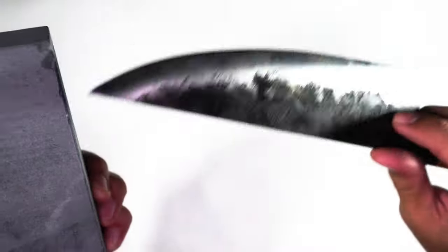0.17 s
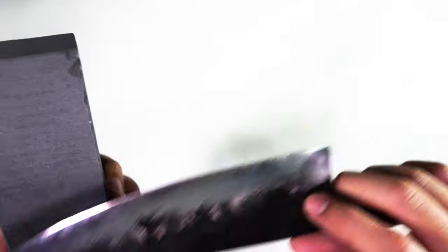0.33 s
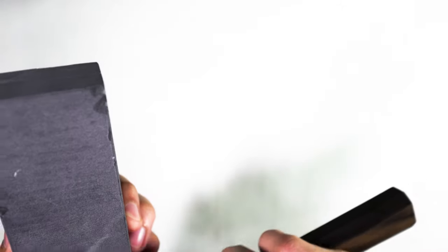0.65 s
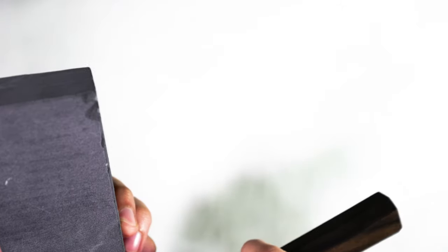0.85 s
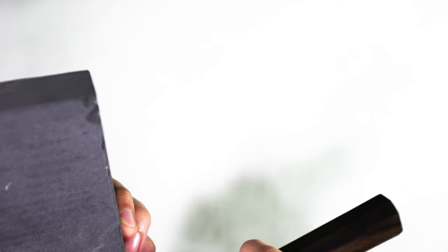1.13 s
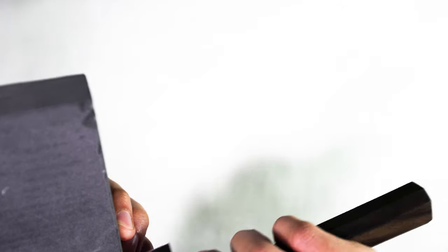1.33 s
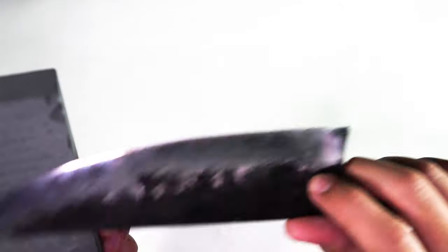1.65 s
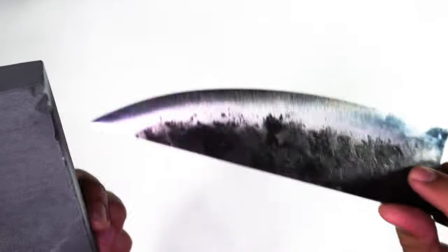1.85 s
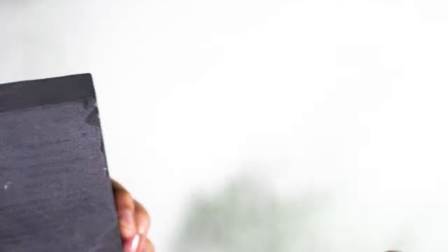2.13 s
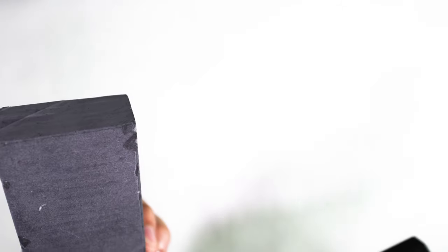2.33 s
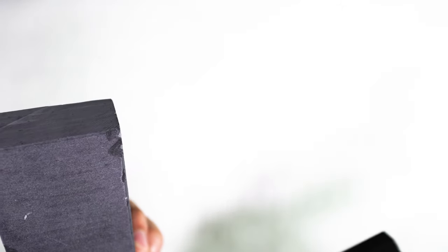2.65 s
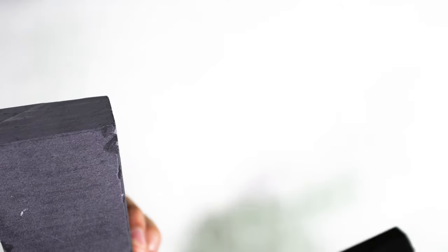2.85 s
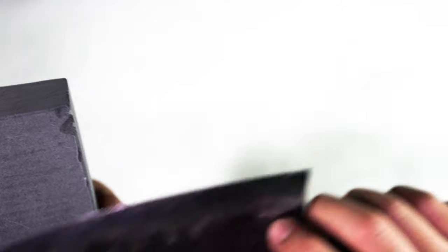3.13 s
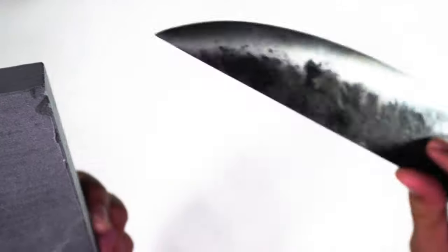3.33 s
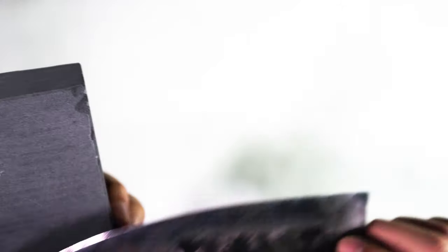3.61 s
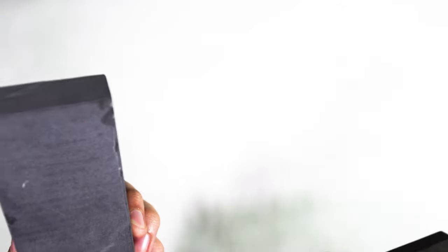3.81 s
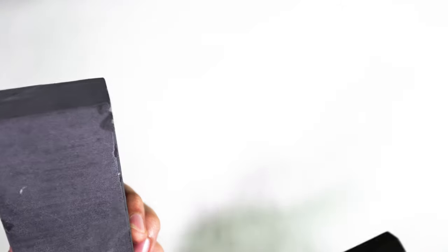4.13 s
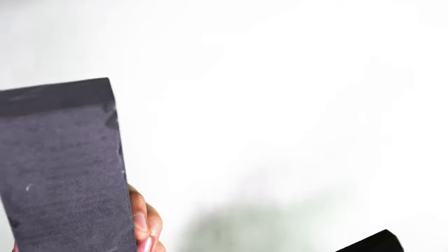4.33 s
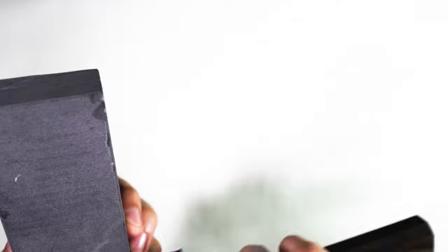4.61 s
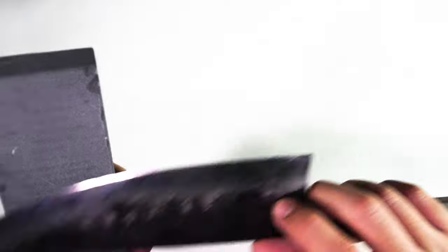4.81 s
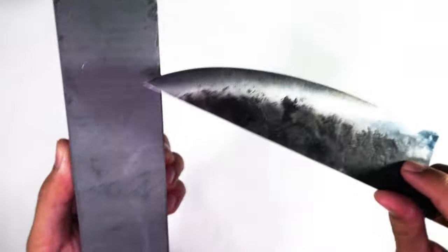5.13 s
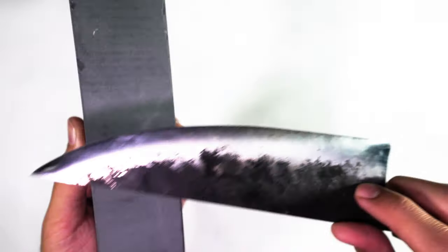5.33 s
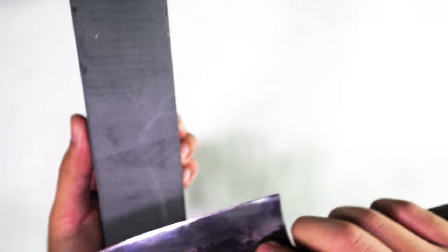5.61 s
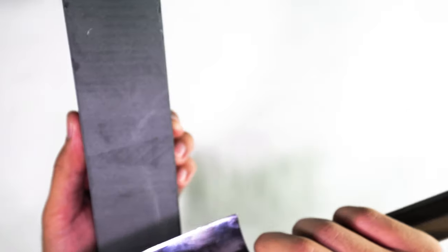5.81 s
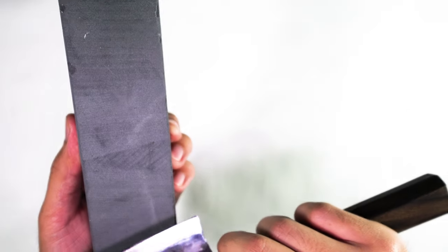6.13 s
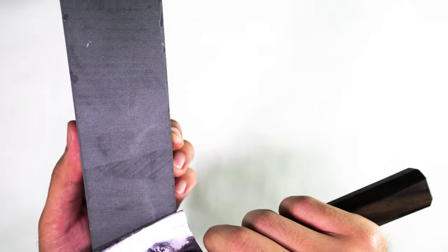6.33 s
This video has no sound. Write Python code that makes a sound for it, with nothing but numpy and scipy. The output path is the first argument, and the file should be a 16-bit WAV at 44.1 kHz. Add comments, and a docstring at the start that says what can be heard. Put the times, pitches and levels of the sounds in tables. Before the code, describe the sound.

Gritty, bright scraping of knife on whetstone, close to the microphone. Strokes come slowly, with more than a second between them, each starting softly, pressing hard and stopping abruptly with a very short steel ring. Faint taps and brushes precede the later strokes. Afterwards only barely audible touches remain over steady low fan rumble in a small, short-echoing room.

```python
"""Knife on a whetstone

Close on a hand-held whetstone: a steel blade is drawn over it heel to tip four times, the first stroke
already under way. Light touches come between the strokes and after the last.
Uneven noise stands for grit; as the contact slides along the edge, one plate resonance after another
lights up over the stone's hiss, with a short steel ring beside it. A small room answers over steady
ventilation rumble, made of shaped noise and fan lines; the recorder ducks a little on loud strokes.
"""
import sys
import numpy as np
from scipy import signal
from scipy.fft import rfft, irfft
from scipy.io import wavfile
from scipy.ndimage import uniform_filter1d, map_coordinates

SR = 44100
rng = np.random.default_rng(int(sys.argv[2]) if len(sys.argv) > 2 else 0)


def invert_db(level):
    """Linear amplitude ratio for a level in decibels (20 dB per decade), elementwise."""
    return 10 ** (np.asarray(level, dtype=float) / 20)


def to_wav(s):
    """Save 16-bit WAV."""
    ch = np.atleast_2d(s).T  # columns
    pcm = np.round(np.clip(ch, -1, 1) * 32767)  # PCM
    wavfile.write(sys.argv[1], SR, pcm.astype(np.int16))


N = 284886  # samples
FRAME, HOP = 1536, 128  # samples, for the moving blade filter


def unit(x):
    """Scales a signal to an rms of one."""
    return x / np.sqrt(np.mean(x ** 2) + 1e-20)


def along(points, hz):
    """Reads (Hz, value) points on a log frequency axis."""
    point_hz, values = np.transpose(points)
    return np.interp(np.log(hz + 1), np.log(point_hz + 1), values)


def wobble(rate):
    """A smooth random curve with rate knots a second."""
    knots = rng.standard_normal(int(N * rate / SR) + 4)
    return map_coordinates(knots, [np.arange(N) * rate / SR])


def causal(gain):
    """Minimum-phase responses for columns of gains, so that no sound precedes its cause."""
    cepstrum = irfft(np.log(gain + 1e-6), axis=0)
    half = len(cepstrum) // 2
    cepstrum[1:half] *= 2
    cepstrum[half + 1:] = 0
    return np.exp(rfft(cepstrum, axis=0))


# Strokes over the stone. Places run from 0 at the heel to 1 at the tip, in blade lengths.
# Each row: touch in seconds, lift in seconds, settling time in seconds, easing time before the lift in
# seconds, starting place before drag, drag in blade lengths, low-mode drive at mid-blade in dB.
STROKE_ROWS = [(-.39, 0.131, .02, .036, .1, .07, 0), (1.202, 1.845, .016, .056, -.015, -.012, -2.5),
               (2.806, 3.349, .04, .027, -0.011, .07, 6.5), (4.5, 5.039, .03, .068, .09, .065, -5)]
# The hand falls behind an even pace, then catches up.
# Each row: share of the stroke 0-1, share of the drag.
HAND_LAG = [(0, -0.14), (.35, 1.01), (.6, .7), (.72, 0), (.84, -.35), (1, -0.1)]
# The edge bites harder or skips for a moment.
# Each row: centre in seconds, level change in dB, time from centre to 1/e of that in seconds.
BITE_ROWS = [(0.086, 2.5, .03), (1.304, -5, .02), (1.58, 3, .012), (2.972, 0.5, .05), (3.044, 2.5, .025),
             (4.717, 2, .04), (4.9, -1.5, .06), (4.961, 2.1, 0.011)]
# Light touches of the edge or, at places beyond 0-1, of its corners.
# Each row: peak in seconds, level in dB, rise in seconds, time to fall 20 dB in seconds,
# place in blade lengths, low-mode drive in dB.
TOUCH_ROWS = [(1.02, -47, .035, 0.032, 1.3, -2.5), (2.546, -35, .012, 0.041, -.3, -15),
              (2.572, -46, .004, .012, -.3, -7.5), (2.62, -57, .015, .01, -.3, -7.5),
              (2.768, -45, .018, 0.059, -.3, -5.5), (2.81, -35, .02, .2, -.27, -5),
              (4.29, -33, .026, .022, 1.3, 0), (4.407, -52, .002, .03, -0.017, -19),
              (4.433, -32, .007, .014, .15, -16.5), (4.469, -45, .003, .045, .12, -12.5),
              (5.345, -61.5, .012, .03, -0.17, -10), (5.64, -63, .03, .04, -0.12, -10.5)]


def contacts(t):
    """Scraping level, place on the edge and low-mode drive; the strongest contact sets the last two."""
    press_db, land_db, ease_db = -17, -45.5, -9  # full pressure; first and last contact relative to it
    end_place, mid_place, mid_reach = 0.95, .58, .12  # blade lengths; the end is before drag
    ends_db, soft_landing = 1, .15  # low-mode drive off mid-blade; dB lost per dB of missing pressure
    touch_rise_db = 24
    rows = []
    for touch_s, lift_s, settle_s, ease_s, start, drag, mid_db in STROKE_ROWS:
        share = np.clip((t - touch_s) / (lift_s - touch_s), 0, 1)
        missing_db = land_db * np.exp(-np.clip(t - touch_s, 0, None) / settle_s)
        easing_db = ease_db * np.clip(1 + (t - lift_s) / ease_s, 0, 1)
        bites_db = sum(bite_db * np.exp(-((t - s) / length_s) ** 2) for s, bite_db, length_s in BITE_ROWS)
        even_place = start + (end_place - start) * share
        place = even_place - drag * np.interp(share, *np.transpose(HAND_LAG))
        middle = np.exp(-((place - mid_place) / mid_reach) ** 2)
        low_db = ends_db + (mid_db - ends_db) * middle + soft_landing * missing_db
        # lifted: falls away steeply outside the stroke
        outside_s = np.clip(touch_s - t, 0, None) + np.clip(t - lift_s, 0, None)
        lifted_db = 1e4 * outside_s + 60 * ((t < touch_s) | (t > lift_s))
        rows.append((press_db + missing_db + easing_db + bites_db - lifted_db, place, low_db))
    for s, db, rise_s, fall_s, place, low_db in TOUCH_ROWS:
        rise_db = touch_rise_db * (t - s) / rise_s - 60 * (t < s - rise_s)
        shape_db = np.where(t < s, rise_db, 20 * (s - t) / fall_s)
        rows.append((db + shape_db, place + 0 * t, low_db + 0 * t))
    db, place, low_db = np.transpose(rows, (1, 0, 2))
    lead = db.argmax(axis=0), np.arange(len(t))
    return np.sqrt(np.sum(invert_db(2 * db), axis=0)), place[lead], low_db[lead]


def grit():
    """Dense uneven scratches under the hand's pressure, all but silent while the blade is lifted."""
    t = np.arange(0, N / SR, .0005)
    pressure = np.interp(np.arange(N) / SR, t, contacts(t)[0])
    scratches = rng.standard_normal(N) * invert_db(0.75 * rng.exponential(1, N))
    judder = invert_db(0.71 * wobble(25) + 1.1 * wobble(200))  # the edge catches and slips
    return pressure * unit(scratches * judder)


# Broad scrape of the stone itself, also the floor under the blade's resonances.
# Each row: frequency in Hz, relative level in dB.
STONE_HISS = [(600, -75.5), (1300, -62.5), (2200, -54), (3300, -44), (4500, -51), (6500, -45),
              (10000, -46.5), (16000, -57.5)]


def hiss(force):
    """The stone's broad scrape: grit noise filtered to a smooth spectrum."""
    gain = invert_db(along(STONE_HISS, np.fft.rfftfreq(N, 1 / SR)))
    return irfft(rfft(force) * gain / np.sqrt(np.mean(gain ** 2)), N)


# Resonances of the pressed blade.
# Each row: frequency in Hz, width 6 dB down in Hz, place of best drive in blade lengths, reach in blade
# lengths, relative level in dB, glide in Hz per blade length.
BLADE_MODES = [(467.5, 79, 0.63, 0.09, -25.5, -600), (810, 420, -0.05, 0.17, -40, -1700),
               (910, 190, 0.81, 0.08, -37, -2200), (960, 70, 0.12, 0.15, -25.5, 800),
               (1033, 63, 0.22, 0.062, -18, 0), (1036, 74, 0.73, 0.077, -29.5, -400),
               (1068, 77, 0.41, 0.08, -26.5, -600), (1070, 81, 0.6, 0.09, -26.5, 300.5),
               (1104, 64, 0.23, 0.03, -19, 101), (1120, 60, 0.65, 0.03, -21.5, -100),
               (1280, 90, 0.65, 0.12, -38.5, -2000), (1328, 120, 0.18, 0.077, -28, -200),
               (1476, 130, 0.93, 0.05, -24, -3000), (1620, 100, 0.62, 0.047, -14.5, 800),
               (1610, 180, 0.45, 0.1, -24.5, -100), (1710, 100, 0.17, 0.05, -13, -700),
               (1704, 120, 0.39, 0.06, -22.5, 800), (1712, 240, 0.819, 0.07, -20, -1800),
               (1775, 110, -0.01, 0.08, -8, -900), (1816, 90, 0.08, 0.036, -8, 500),
               (2110, 190, 0.16, 0.1, -21.5, 700), (2107, 100, 0.57, 0.08, -18.5, 800),
               (2397, 240, 1.036, 0.14, -12, -300), (2466, 85, 0.76, 0.05, -12.5, 600),
               (2550, 180, 0.48, 0.079, -22.5, -900), (2580, 470, 0.06, 0.08, -22, 199.5),
               (2580, 150, 0.29, 0.092, -15, 2200), (2710, 190, 0.33, 0.063, -7.5, 2199.5),
               (2760, 170, 0.4, 0.05, -7, -2300), (2852, 190, 0.84, 0.061, -24, 99),
               (2875, 250, 0.845, 0.04, -10, -400), (3235, 290, 0.76, 0.19, -24.5, -400),
               (3300, 200, 0.18, 0.14, -10, 200), (3400, 190, 0.2, 0.044, -9, 1599.5),
               (3459, 250, 0.476, 0.05, -7.5, 200.5), (3454, 100, 1.05, 0.1, -7, -300),
               (3870, 110, 0.63, 0.099, -14.5, 500.5), (3897, 260, 0.88, 0.033, -11, -200),
               (3896, 140, 0.28, 0.092, -12, 200), (4291, 180, 0.11, 0.18, -16, 199),
               (4310, 220, 0.65, 0.2, -17, 100), (4420, 240, 0.58, 0.03, -6.5, 1000),
               (4944, 240, 0.92, 0.07, -12.5, -200), (4950, 320, 0.26, 0.2, -30, 100.5),
               (5057, 200, 0.49, 0.054, -15.5, -700), (5065, 240, 0.7, 0.05, -10, 100),
               (5640, 220, 0.85, 0.14, -17.5, 199.5), (5620, 140, 0.49, 0.033, -17.5, -200),
               (5737, 250, 0.66, 0.027, -13.5, 99.5), (5706, 280, 0.11, 0.082, -15.5, -400),
               (6080, 420, 0.7, 0.047, -19.5, -0.5), (6100, 650, 0.53, 0.04, -25, 1500.5),
               (6160, 420, 0.34, 0.08, -30, 400), (6380, 250, 0.09, 0.059, -21.5, -700),
               (6800, 220, 0.87, 0.2, -21, -0.5), (6900, 240, 0.14, 0.072, -25.5, 299.5),
               (7100, 90, 0.55, 0.09, -19.5, 100.5), (7160, 170, 0.94, 0.03, -13, -400),
               (7185, 160, 0.74, 0.09, -11, -500), (7180, 150, 0.14, 0.068, -16, 299),
               (7220, 63, 0.02, 0.054, -2.5, -500), (7330, 180, 0.26, 0.038, -23.5, -600),
               (7670, 160, 0.74, 0.03, -20, -100), (7850, 200, 0.24, 0.12, -19.5, 1100),
               (7870, 560, 0.47, 0.1, -20, -3100), (8160, 430, 1.05, 0.091, -16.5, -200),
               (8340, 290, 0.91, 0.12, -25.5, 400), (8756, 140, 0.8, 0.14, -12.5, -200),
               (8780, 170, 0.06, 0.2, -22.5, 700.5), (8840, 200, 0.44, 0.07, -18.5, -1100),
               (9440, 330, 0.64, 0.1, -24, -1100), (9500, 340, 0.23, 0.12, -29, -100),
               (9900, 550, 0.56, 0.045, -19.5, 2599.5), (10200, 170, 0.32, 0.06, -29.5, -300),
               (10280, 260, 0.92, 0.2, -28, 299.5), (10620, 240, 0.88, 0.12, -20.5, 500),
               (10530, 290, 0.13, 0.12, -29.5, 401), (10700, 260, 0.44, 0.08, -23, -300),
               (10900, 160, 0.25, 0.03, -27, 0), (11100, 220, 0.31, 0.08, -29, -100),
               (11230, 150, -0.011, 0.07, -21.5, -100), (11280, 270, 0.69, 0.055, -18.5, -1600),
               (11880, 310, 0.87, 0.1, -28, -600), (12030, 320, 0.67, 0.05, -22, -600),
               (12100, 230, 0.83, 0.14, -30, 0.5), (12200, 430, 0.66, 0.03, -20, 399.5),
               (12360, 600, 0.43, 0.2, -37, -100), (12710, 370, 0.46, 0.06, -30, 1299.5),
               (12790, 150, -0.05, 0.16, -27.5, 1000.5), (12890, 600, 0.21, 0.12, -33.5, 901),
               (13020, 230, 0.56, 0.03, -29.5, 200.5), (12940, 560, 0.77, 0.09, -27.5, -700),
               (13750, 420, 0.1, 0.14, -33.5, 100.5), (13900, 350, 0.69, 0.14, -27, -200),
               (14080, 420, 0.71, 0.03, -20, -1700), (14840, 340, 0.14, 0.13, -33, -100),
               (14860, 590, 0.78, 0.17, -35, -600), (14970, 280, 0.37, 0.05, -32, -700),
               (15670, 90, 0.76, 0.09, -27, -300)]
# Resonances woken by a touch of the heel corner. Each row: frequency in Hz, relative level in dB.
HEEL_MODES = [(1870, -31), (2580, -15), (3150, -17), (3750, -20.5), (5147, -24), (5700, -24), (6377, -19),
              (7210, -21), (7690, -22.5), (8270, -34.5), (8800, -30.5), (9600, -35.5), (12950, -37.5),
              (13440, -38), (14870, -38)]
# Resonances woken by a touch of the tip. Each row: frequency in Hz, relative level in dB.
TIP_MODES = [(1350, -20), (2000, -24), (2700, -20.5), (3200, -22), (3800, -20), (4980, -22.5),
             (6100, -21.5), (7120, -15), (7690, -27), (8730, -28), (9620, -27.5), (10680, -33.5),
             (11075, -34), (11890, -32), (14810, -36.5)]


def blade(force):
    """Each plate resonance, over the stone's hiss, is driven most where the contact sits on its antinode."""
    hz, t, z = signal.stft(force, SR, nperseg=FRAME, noverlap=FRAME - HOP)
    hz, place = hz[:, None], np.linspace(-.3, 1.3, num=161)
    # corners: width in Hz, then place and reach in blade lengths
    heel = [(mode_hz, 330, -.3, .1, db, 0) for mode_hz, db in HEEL_MODES]
    tip = [(mode_hz, 450, 1.3, .1, db, 0) for mode_hz, db in TIP_MODES]
    power = invert_db(2 * along(STONE_HISS, hz)) + 0 * place
    for centre_hz, width_hz, best, reach, db, glide in BLADE_MODES + heel + tip:
        drive = invert_db(2 * db) * np.exp(-((place - best) / reach) ** 2)
        detune = 2 * (hz - centre_hz - glide * (place - best)) / width_hz
        power += drive / (1 + detune ** 2) ** 2  # steep skirts leave dark valleys
    power *= 1 / (1 + (330 / (hz + 1)) ** 8)  # a thin plate radiates no bass
    response = causal(np.sqrt(power / power.mean(axis=0)))
    _, where, low_db = contacts(t)
    now = np.round(np.interp(where, place, np.arange(len(place)))).astype(int)
    firm = invert_db(low_db / (1 + (hz / 1900) ** 4))  # a firm contact bends the low modes
    # uneven grit favours now one mode, now another
    patches = uniform_filter1d(rng.standard_normal(z.shape), size=7, axis=0)
    patches = uniform_filter1d(patches, size=7, axis=1)
    favour = invert_db((2.08 + hz / 9000) * unit(patches))
    z = z * response[:, now] * firm * favour
    return signal.istft(z, SR, nperseg=FRAME, noverlap=FRAME - HOP)[1][:N]


# The blade ringing freely. Each row: frequency in Hz, relative level in dB, time to fall 60 dB in seconds.
RING_MODES = [(3880, -5, .2), (5000, -5, .16), (7200, 0.5, .22), (8800, -1, .26), (10500, -5.5, .2),
              (11150, -9, .18)]


def ring(force):
    """The steel sings on briefly after the contact lets go, as decaying sines."""
    t = np.arange(SR // 2) / SR
    modes = sum(invert_db(db - 60 * t / t60) * np.sin(2 * np.pi * hz * t) for hz, db, t60 in RING_MODES)
    return signal.fftconvolve(force, modes / np.linalg.norm(modes))[:N]


# Decay of the small room. Each row: frequency in Hz, time to fall 60 dB in seconds.
ROOM_DECAY = [(500, .2), (2500, 0.28), (7000, 0.28), (15000, 0.2)]


def room(x):
    """The walls' answer, a noise tail in which each frequency dies at its own speed."""
    hz, t, z = signal.stft(rng.standard_normal(SR // 2), SR, nperseg=256)
    fading = z * invert_db(-60 * t / along(ROOM_DECAY, hz)[:, None])
    tail = signal.istft(fading, SR, nperseg=256)[1]
    late = np.pad(x, (200, 0))  # samples: about 1.6 m of extra path
    return signal.fftconvolve(late, tail / np.linalg.norm(tail))[:N]


# Ventilation rumble in the room. Each row: frequency in Hz, relative density in dB per Hz.
AIR_SPECTRUM = [(25, -60), (38, -40), (50, -16), (68, -4), (145, 0), (350, -4), (400, -11), (480, -13.5),
                (560, -9), (650, -9.5), (800, -15), (1050, -14), (2400, -26.5), (5000, -36.5),
                (6600, -37.5), (14000, -45.5), (16200, -51)]
# Fan lines. Each row: frequency in Hz, level in dB before a common lift.
FAN_LINES = [(151, -59), (350, -61), (592, -62.5), (651, -63)]


def air():
    """Ventilation rumble as shaped noise, with a few fan lines wavering in level and phase."""
    hz, _, z = signal.stft(rng.standard_normal(N), SR, nperseg=4096)
    noise = signal.istft(z * invert_db(along(AIR_SPECTRUM, hz))[:, None], SR, nperseg=4096)[1][:N]
    t = np.arange(N) / SR
    lines = 0
    for line_hz, db in FAN_LINES:
        level = invert_db(db + 2.5 + 1.0 * wobble(4))
        lines = lines + level * np.sin(2 * np.pi * line_hz * t + 1.6 * wobble(5))
    return invert_db(-47 + 0.93 * wobble(3.2)) * unit(noise) + lines


def scene():
    """Mixes the blade, its ring and the walls over the air; a separate broad scrape feeds only the walls."""
    force = grit()
    knife = blade(force)
    walls = room(knife + invert_db(-3.5) * hiss(force))
    sharpening = knife + invert_db(-35.5) * ring(force) + invert_db(-12.0) * walls
    return (invert_db(3.5) * sharpening + air())[None]


def top_cut(x):
    """Nothing passes above the cut-off."""
    return signal.sosfilt(signal.butter(12, 16220, fs=SR, output="sos"), x)


def record(dry):
    """The recorder's gain control is quick to duck on loud sound and slow to come back."""
    step = SR // 100  # 10 ms
    blocks = dry[0, :N // step * step].reshape(-1, step)
    loud_db = 10 * np.log10(np.mean(blocks ** 2, axis=1) + 1e-12)
    want_db = -.22 * np.clip(loud_db + 33, 0, None)  # ducks above -33 dB
    held, gain_db = want_db[:8].min(), []
    for want in want_db:
        held += (.15 if want < held else .013) * (want - held)  # share of the way per step
        gain_db.append(held)
    x = dry * invert_db(np.interp(np.arange(N) / step, np.arange(len(gain_db)), gain_db))
    x = x / (1 + np.abs(x / .62) ** 4) ** .25  # the input stage rounds the highest peaks
    return top_cut(x)


dry = scene()
out = record(dry)
to_wav(out)
```